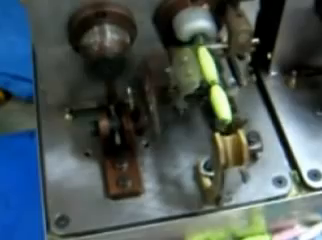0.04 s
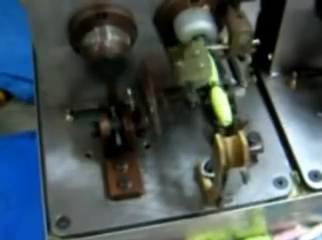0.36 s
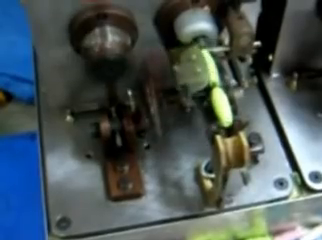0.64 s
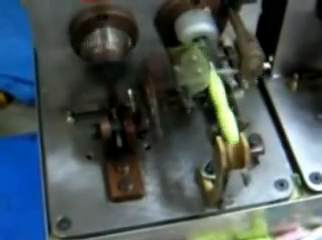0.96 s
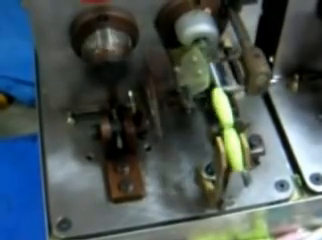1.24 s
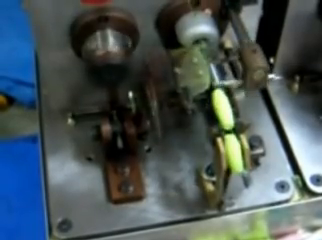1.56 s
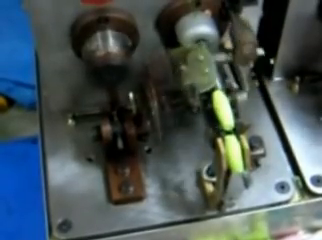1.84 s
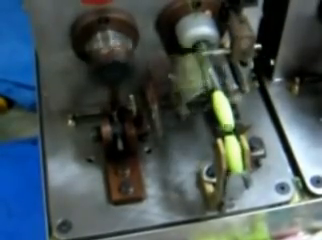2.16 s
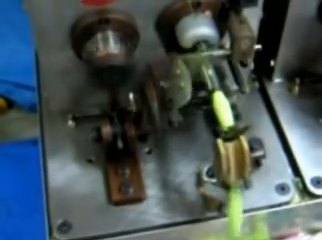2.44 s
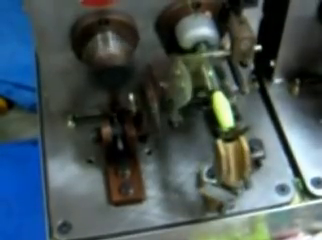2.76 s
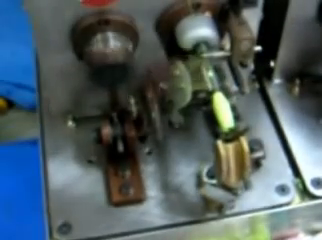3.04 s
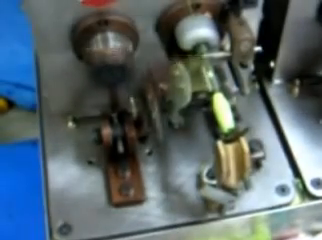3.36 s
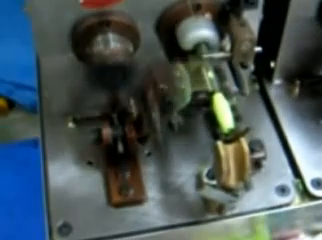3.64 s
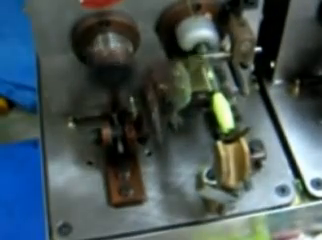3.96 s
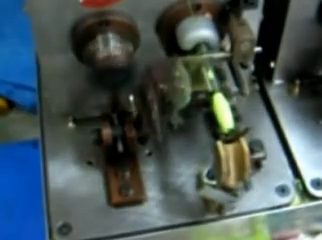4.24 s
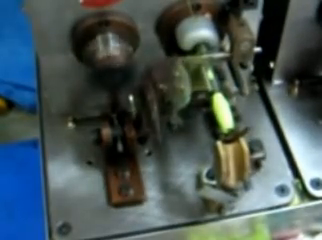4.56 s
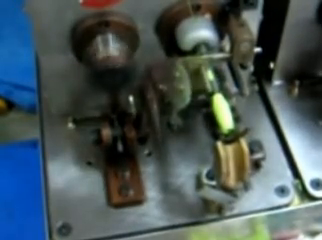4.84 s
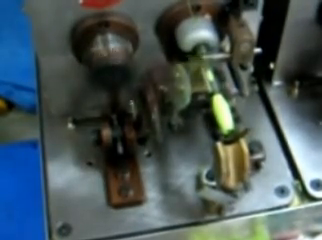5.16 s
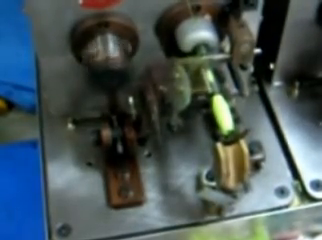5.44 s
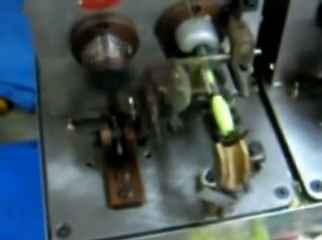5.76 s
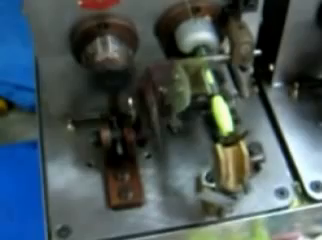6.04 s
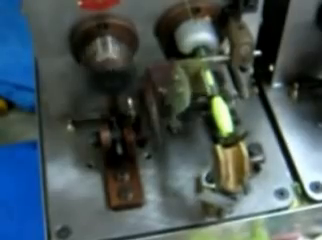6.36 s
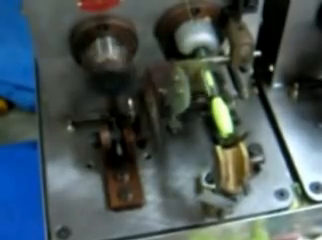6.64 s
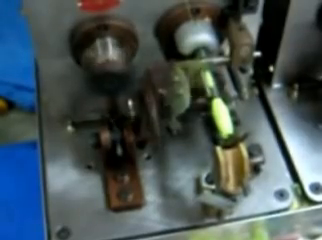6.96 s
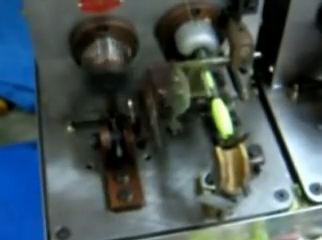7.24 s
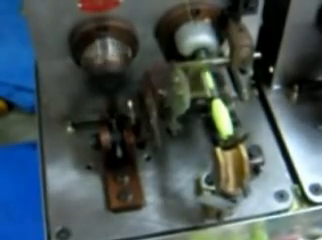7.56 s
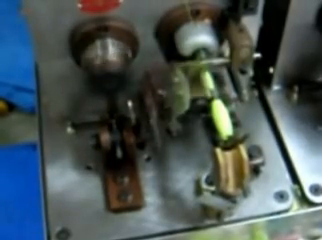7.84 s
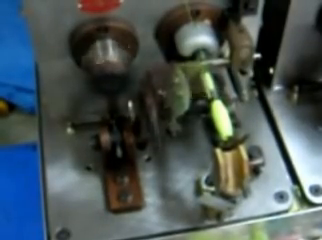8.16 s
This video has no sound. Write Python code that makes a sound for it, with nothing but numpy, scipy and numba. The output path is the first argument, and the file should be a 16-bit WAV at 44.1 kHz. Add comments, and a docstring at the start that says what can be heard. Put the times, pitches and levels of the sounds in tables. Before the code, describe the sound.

A winding machine hums and whirs steadily in a workshop, with faint thread squeaks, a lever's knock and a sharp latch snap.

```python
"""A workshop full of machines, with a bobbin winder running close to a small mono camera.
The spindle whirs, the drive shaft hums and thread rasps through its guide. The frame drones until a
lever knocks over; then a latch snaps and the winding goes on, over the din and rattle of the room.
The camera's gain control ducks at the loud blows and creeps back."""
import sys
import numpy as np
from scipy import signal
from scipy.fft import rfft, irfft, next_fast_len
from scipy.io import wavfile
from scipy.ndimage import uniform_filter1d, map_coordinates
from numba import njit

SR = 44100
rng = np.random.default_rng(int(sys.argv[2]) if len(sys.argv) > 2 else 0)


def persist_wave(psi):
    """Save psi, clipped to +-1, as 16-bit WAV."""
    counts = np.round(np.clip(psi, -1, 1) * 32767).astype(np.int16)
    wavfile.write(sys.argv[1], SR, np.atleast_2d(counts).T)


N = 362061
T = np.arange(N) / SR
SPINDLE_HZ, SHAFT_HZ = 56.33, 21.145
# cues: the spindle couples in, the load drops off, the lever goes over, the load returns
COUPLE_S, SLACK_S, LEVER_S, RELOAD_S = 2.28, 2.39, 3.03, 3.527
SHIFT_S = 0.1412  # time the load takes to shift


# EQ curve of the spindle's whirr (frequency [Hz], relative level [dB])
WHIRR_EQ = [(620, -31.5), (1050, -7.5), (1300, 1), (1400, -3.5), (1620, -1.5), (1730, -5), (1930, -3),
            (2290, -6.5), (2940, -1), (3380, -9.5), (3940, -24), (4470, -24), (4830, -29), (6280, -56.5),
            (10600, -120)]
# steady tones of the spindle and its bearing (frequency [Hz], relative level [dB])
WHINE_TONES = [(732.3, -29), (1577, -38.5), (2550, -45), (2647.3, -41), (2929, -39), (2985.5, -43),
               (3042, -40.5), (3267.3, -35), (3323.6, -38.5), (3380, -49), (3436.4, -49), (3553, -50),
               (3661.6, -51), (4214, -58), (4550, -58), (4608, -55)]

def spindle():
    """Dense bearing ticks blur into a whirr that swells with each turn; the races whine on top."""
    turn = 2 * np.pi * SPINDLE_HZ * T + 0.26 * walk(1.8)
    shaft = 2 * np.pi * shaft_turns()
    load = 1 + .21 * np.cos(turn) + .1 * np.cos(6 * turn) + .07 * np.cos(7 * turn)
    load += .09 * np.cos(shaft) + .08 * np.cos(2 * shaft)
    ticks = repeat(rng.standard_normal(N), SPINDLE_HZ, share=0.16, fade_hz=20000)
    whirr = colour(ticks * load * undb(0.32 * walk(400)), WHIRR_EQ)
    whine = tones(WHINE_TONES, wobble_rad=0.22, flutter_db=1.6, rate_hz=4)
    whirr_db = -22.57 - 1.5 * uncoupled()
    whine_db = -3.5 - 20.5 * uncoupled()
    return slack_dip() * (undb(whirr_db) * whirr + undb(whine_db) * whine)


# hum of the drive shaft and its gears (pitch [multiples of shaft speed], relative level [dB])
DRIVE_PARTIALS = [(9, -26.5), (10, -38), (11, -24), (12, -24.5), (14, -24.5), (15, -39.5), (17, -37),
                  (20, -40.5), (22, -32.5), (32, -32), (37, -35), (45, -30), (47, -36), (56, -42),
                  (63, -35.5), (69, -42)]

def drive(gear_teeth=31, gear_entry_s=6.65):
    """Shaft and gears hum, locked to one uneven turning; the hum steps up at the lever."""
    turn = 2 * np.pi * shaft_turns() + 0.024 * walk(2.014)

    def partial(order):
        level = np.sqrt(2) * undb(1.2 * walk(6))
        return level * np.sin(order * turn + 0.068 * walk(7.1) + 2 * np.pi * rng.random())

    hum = sum(undb(db) * partial(order) for order, db in DRIVE_PARTIALS)
    late_gear = undb(-25.5) * ramp(gear_entry_s, 0.14) * partial(gear_teeth)
    return undb(-1.5 - 4.5 * before_lever()) * slack_dip() * hum + late_gear


# loudest squeaks of the thread (time [s], level [dB])
THREAD_SQUEAKS = [(.765, -22), (0.857, -23.5), (0.904, -20), (1.055, -21), (1.278, -27), (1.339, -21),
                  (1.358, -19), (1.464, -21), (1.635, -20.5), (1.777, -21), (2.068, -24)]
# the guide scraping as it shifts (time [s], length [s], level [dB], centre [Hz], width [Hz])
GUIDE_SCRAPES = [(0.664, 0.031, -17.5, 740, 300), (0.959, 0.078, -14.5, 1260, 700),
                 (0.989, 0.06, -13.5, 660, 350), (1.38, 0.045, -16, 390, 120),
                 (1.557, 0.057, -18.5, 360, 110.3), (2.189, 0.038, -18, 394, 130),
                 (2.352, 0.093, -19, 1050, 935), (2.37, 0.058, -25, 2860, 804),
                 (2.658, 0.015, -19, 720, 220)]

def thread(peak_s=1.8, spread_s=1.9, slip_hz=13.65):
    """Thread rasps through its guide in quick uneven slips, with squeaks and scrapes as accents."""
    tension = np.exp(-((T - peak_s) / spread_s) ** 2 / 2) * before_lever()
    tug = np.cos(2 * np.pi * slip_hz * T) + np.cos(2 * np.pi * SHAFT_HZ * T)  # bobbin and shaft
    slips = 1 + np.tanh(1.6 * walk(60) + 0.63 * tug - .5)  # near 0 sticking, near 2 sliding
    out = undb(-31.5) * tension * unit(band(rng.standard_normal(N), 2830, 180) * slips)
    for s, db in THREAD_SQUEAKS:
        add(out, s, undb(db) * rub(length_s=0.017, hz=2780, width_hz=440))
    for s, length_s, db, hz, width_hz in GUIDE_SCRAPES:
        add(out, s, undb(db) * rub(length_s, hz, width_hz))
    return out


# frame tones that come and go as the load shifts
# (pitch [multiples of shaft speed], level [dB], start [s], end [s])
PASSING_TONES = [(14, -24.5, 0, .95), (16, -29, 1.4, 2.4), (9, -31, 2.05, 2.98), (13, -18.5, 2.44, 2.98)]

def frame_drone(main_order=11, throb_hz=5.13, throb_peak_s=1.02, fade_s=.058):
    """The shaft sets the frame droning: one tone swells, throbs and cuts at the lever; others drift by."""
    turn = 2 * np.pi * shaft_turns()
    throb_depth = .5 * (1 - ramp(SLACK_S, SHIFT_S))
    throb = 1 + throb_depth * np.cos(2 * np.pi * throb_hz * (T - throb_peak_s))
    swell = undb(-25.5 + 4.5 * ramp(0, 0.55))
    gate = 1 - ramp(LEVER_S - .03, .03)
    drone = np.sin(main_order * turn + 0.16 * walk(14)) * throb * swell * gate
    for order, db, start_s, end_s in PASSING_TONES:
        tone = np.sin(order * turn + 0.085 * walk(9)) * undb(db + 1.7 * walk(20))
        drone += tone * (ramp(start_s, fade_s) - ramp(end_s, fade_s))
    return np.sqrt(2) * drone


# ring of the lever (frequency [Hz], relative level [dB], t60 [s])
LEVER_MODES = [(290, -5, .1), (405, 7, .05), (673, -9, .2), (958, -12, .2), (1136, .5, .135),
               (1355, -6, .17), (1640, -14, .2), (2094, -13, .17), (2363, -5, .09), (2660, -2, .04)]
# knocks of the lever (time [s], level [dB], brightness [Hz], ring length [multiples of t60])
LEVER_HITS = [(3.021, -2, 1700, 1.4), (3.032, -11.5, 2400, 1.3)]
# ring of the frame where the lever lands (frequency [Hz], relative level [dB], t60 [s])
FRAME_MODES = [(275, 0, .22), (393, -5, .11), (880, -7, .03), (1136, -3.5, .19), (1351, -13, .16)]
# landings on the frame (time [s], level [dB], brightness [Hz], ring length [multiples of t60])
FRAME_HITS = [(3.144, -6, 1400, 1.15), (3.199, -12.5, 1100, 1)]

def lever():
    """The lever knocks over, then lands on the frame with two duller bumps."""
    knock = blows(LEVER_HITS, LEVER_MODES, clatter_db=2.5, clatter_t60=.16, clatter_hz=1100, width_hz=1600)
    landing = blows(FRAME_HITS, FRAME_MODES, clatter_db=-6, clatter_t60=.09, clatter_hz=800, width_hz=900)
    return knock + landing


# ring of the latch (frequency [Hz], relative level [dB], t60 [s])
LATCH_MODES = [(328, -4, .12), (690, -2, .14), (877, 6, .1), (1270, -4, .08), (1600, 4, .09),
               (2401, -5, .06), (2762, -4, .12), (2975, 2, .12), (3120, 0, .08), (3260, 4, .1),
               (3440, 1, .08), (3700, -1, .07), (4414, -3, .12)]
# snaps and clicks that ring with the latch's modes (time [s], level [dB], brightness [Hz], ring length
# [multiples of t60])
SNAP_HITS = [(0.0, -1.5, 1500, .45), (1.529, -14, 1400, .18), (2.386, -17, 4000, .6),
             (2.41, -18.5, 3500, .5), (2.659, -14.5, 4000, .6), (2.672, -15, 4500, .6),
             (3.672, -13, 700, .3), (3.678, -4.5, 6000, .22), (3.68, -2.5, 6000, .18),
             (3.687, -8, 6000, .8), (3.693, -9.5, 6000, .8), (3.702, -12, 4000, .8),
             (3.725, -18, 6000, .5)]

def latch():
    """Bright clicks come here and there, then the latch snaps in a tight, bright cluster of hits."""
    return blows(SNAP_HITS, LATCH_MODES, clatter_db=2, clatter_t60=0.18, clatter_hz=2000, width_hz=7000)


# surges of the rattle (time [s], length [s], boost [dB])
RATTLE_SURGES = [(4.252, .04, 8), (4.513, 0.086, 8), (4.76, 0.078, 12.5), (5.143, 0.043, 10.5),
                 (5.8, .07, 6.5), (6.478, 0.037, 11), (7.405, .035, 10)]

def rattle(contacts_per_s=420, decay_s=0.003):
    """Loose parts chatter: tiny contacts, thickest once a turn of spindle and shaft, at times surging."""
    spindle_shake = 1 + .6 * np.cos(2 * np.pi * SPINDLE_HZ * T)
    shaft_shake = 1 + .4 * np.cos(2 * np.pi * shaft_turns())
    touches = rng.random(N) < contacts_per_s * spindle_shake * shaft_shake / SR
    contacts = touches * undb(rng.standard_normal(N))
    envelope = signal.lfilter([1], [1, -np.exp(-1 / (decay_s * SR))], contacts)
    surge_db = sum(db * np.exp(-(2 * (T - s) / length) ** 2) for s, length, db in RATTLE_SURGES)
    return band(rng.standard_normal(N) * envelope, 800, 470) * undb(surge_db)


# EQ curve of the workshop's din (frequency [Hz], relative level [dB])
DIN_EQ = [(79, -52), (135, -28.5), (155, -14), (177, -15), (243, -2), (301, -7.5), (324, -10), (352, -8),
          (457, -7.5), (510, -17), (545, -18.5), (575, -12), (651, -10), (749, -8.5), (963, -10),
          (1050, -15.5), (1250, -26), (1620, -42.5), (2750, -120)]

def workshop():
    """The machinery bed: din half looping with the shaft, rattle, the housing's hollow boom, rumble."""
    looping = repeat(rng.standard_normal(N), SHAFT_HZ, share=0.64, fade_hz=900)
    turning = map_coordinates(looping, [shaft_turns() / SHAFT_HZ * SR], mode="mirror")  # sags with the shaft
    din = undb(-15.51) * colour(turning, DIN_EQ)
    boom = undb(-28.51) * ramp(LEVER_S, SHIFT_S) * band(rng.standard_normal(N), 245, 110)
    rumble = band(rng.standard_normal(N), 60, 110) * undb(-55.5 + 2.2 * walk(13))
    machinery = din + undb(-26.01) * rattle() + boom
    return undb(-1 * uncoupled()) * slack_dip() * machinery + rumble


def shaft_turns(sag_hz=.68):
    """Turns made by the shaft: it slows under the growing load and recovers once the lever is over."""
    sag = ramp(start_s=.7, rise_s=.9) * before_lever()
    return np.cumsum(SHAFT_HZ - sag_hz * sag) / SR


def uncoupled():
    """Fades from 1 to 0 as the spindle couples in."""
    return 1 - ramp(COUPLE_S, 0.18)


def before_lever():
    """Fades from 1 to 0 as the lever goes over."""
    return 1 - ramp(LEVER_S, SHIFT_S)


def slack_dip(depth_db=-3):
    """Gain that dips while the load is off."""
    return undb(depth_db * (ramp(SLACK_S, SHIFT_S) - ramp(RELOAD_S, SHIFT_S)))


def blows(hits, modes, clatter_db, clatter_t60, clatter_hz, width_hz):
    """Each blow rings the part's modes and makes the linkage clatter; a soft contact loses the treble."""
    out, t = np.zeros(N), T[:SR // 2]
    for s, db, bright_hz, ring in hits:
        fade = -np.log(1000) * t / ring
        body = 0
        for hz, mode_db, t60 in modes:
            detuned_hz = hz * rng.normal(1, 0.0016)  # a loose part never rings quite the same
            body += undb(mode_db) * np.exp(fade / t60) * np.sin(2 * np.pi * (detuned_hz * t + rng.random()))
        noise = band(rng.standard_normal(len(t)), clatter_hz, width_hz)
        clatter = undb(clatter_db) * np.exp(fade / clatter_t60) * noise
        hit = signal.sosfilt(signal.butter(2, bright_hz, fs=SR, output="sos"), body + clatter)
        add(out, s, undb(db) * hit / np.std(hit[:SR // 100]))  # level set on the first 10 ms
    return out


def rub(length_s, hz, width_hz):
    """A short rub on a resonance, with soft ends."""
    noise = band(rng.standard_normal(N // 40), hz, width_hz)[:int(length_s * SR)]
    return unit(noise) * signal.windows.tukey(len(noise), .5)


def tones(partials, wobble_rad, flutter_db, rate_hz):
    """Steady partials whose phase and level wander."""
    return sum(np.sqrt(2) * undb(db + flutter_db * walk(rate_hz))
               * np.sin(2 * np.pi * (hz * T + rng.random()) + wobble_rad * walk(rate_hz))
               for hz, db in partials)


def repeat(x, turn_hz, share, fade_hz):
    """Feedback comb: a share of each turn's clatter comes back on the next, less so in the treble."""
    return shape(x, lambda f: 1 / np.abs(1 - share * np.exp(-f / fade_hz - 2j * np.pi * f / turn_hz)))


def colour(x, curve):
    """EQ a sound along a curve of (frequency [Hz], level [dB]) points, at rms 1."""
    hz, db = np.transpose(curve)
    return unit(shape(x, lambda f: undb(np.interp(np.log(f), np.log(hz), db))))


def band(x, hz, width_hz):
    """A resonance applied twice, at rms 1."""
    return unit(shape(x, lambda f: 1 / (1 + ((f * f - hz * hz) / (f * width_hz)) ** 2)))


def shape(x, gain):
    """Filter by a gain given as a function of frequency."""
    size = next_fast_len(len(x))
    hz = np.maximum(np.arange(size // 2 + 1) * SR / size, 1)
    return irfft(rfft(x, size) * gain(hz), size)[:len(x)]


def walk(rate_hz):
    """Smooth random drift with a spread of about 1."""
    knots = rng.standard_normal(N // 100)
    return 1.1 * map_coordinates(knots, [T * rate_hz], order=2, mode="wrap")


def ramp(start_s, rise_s):
    """Linear fade from 0 to 1."""
    return np.clip((T - start_s) / rise_s, 0, 1)


def add(out, s, sound):
    """Mix a sound in at time s."""
    start = int(s * SR)
    out[start:start + len(sound)] += sound[:N - start]


def undb(db):
    """Decibels to gain."""
    return 10 ** (np.asarray(db) / 20)


def unit(x):
    """Scale to rms 1."""
    return x / np.sqrt(np.mean(x ** 2))


def scene():
    """Winder and workshop in mono; the drive hum takes over from the drone at the lever."""
    running = workshop() + drive() + spindle()
    small_parts = lever() + latch() + thread()
    # the small parts radiate little bass or top, so the knocks, snaps and scrapes sound thin and dull
    radiation_band = signal.butter(4, [190, 3600], "bandpass", fs=SR, output="sos")
    return (running + signal.sosfilt(radiation_band, small_parts) + frame_drone())[None]


@njit
def duck(over_db, attack, recover):
    """Gain reduction in dB: follows any excess quickly, then recovers at a steady pace."""
    cut, out = 0., np.empty(len(over_db))
    for i in range(len(over_db)):
        if over_db[i] > cut:
            cut += attack * (over_db[i] - cut)
        else:
            cut = max(cut - recover, 0.)
        out[i] = cut
    return out


def record(dry, ceiling_db=-8.5, attack_s=0.0027, recover_db_per_s=17, top_hz=5000, dc_offset=.0377):
    """Gain control that thumps faintly as it ducks, then a narrow-band converter and a clipping output."""
    x = dry[0]
    level_db = 10 * np.log10(np.maximum(uniform_filter1d(x ** 2, SR // 200), 1e-12))
    gain = undb(-duck(level_db - ceiling_db, 1 / (attack_s * SR), recover_db_per_s / SR))
    thump = undb(-17) * signal.sosfilt(signal.butter(2, 45, "highpass", fs=SR, output="sos"), gain - 1)
    converter_lowpass = signal.ellip(10, .2, 80, top_hz, fs=SR, output="sos")
    output_lowpass = signal.ellip(8, .2, 70, 15800, fs=SR, output="sos")
    x = signal.sosfilt(converter_lowpass, np.clip(x * gain + thump, -.82, .82))
    x = signal.sosfilt(output_lowpass, np.clip(x, -.96, .96))
    return x[None] + dc_offset


dry = scene()
out = record(dry)
persist_wave(out)
```